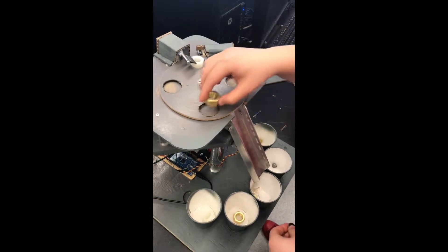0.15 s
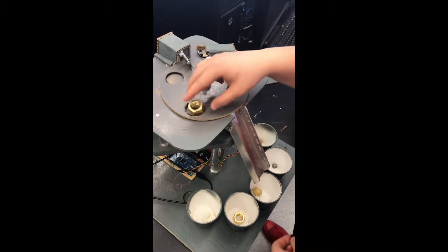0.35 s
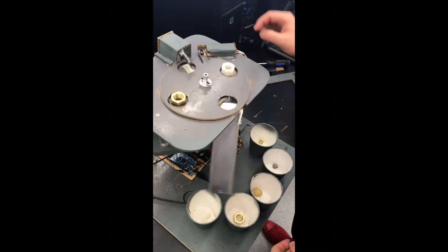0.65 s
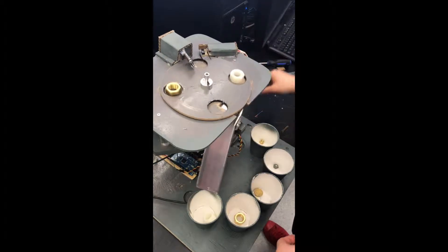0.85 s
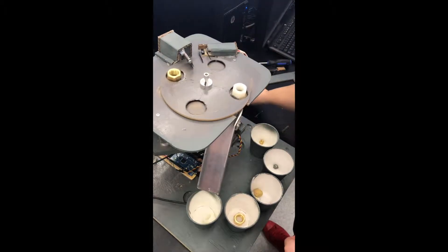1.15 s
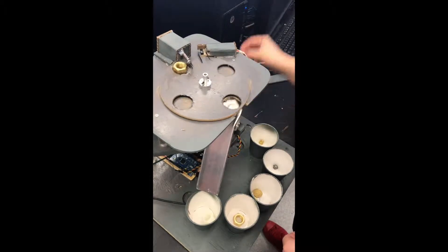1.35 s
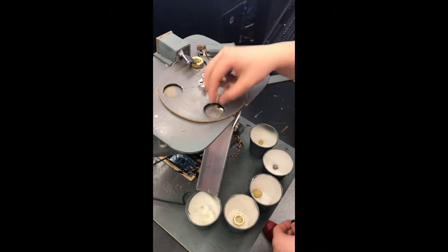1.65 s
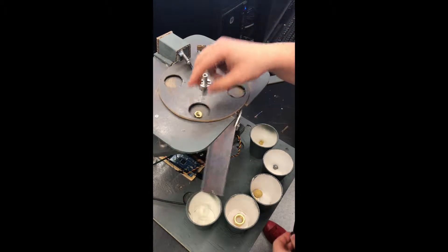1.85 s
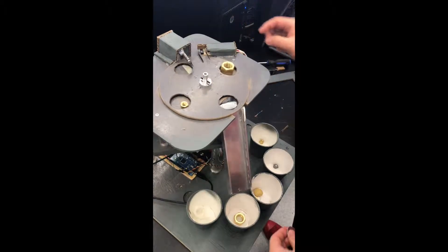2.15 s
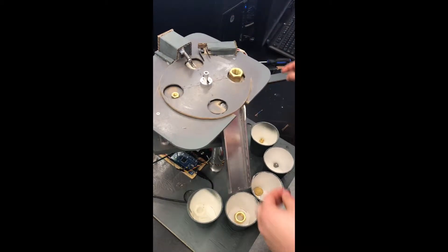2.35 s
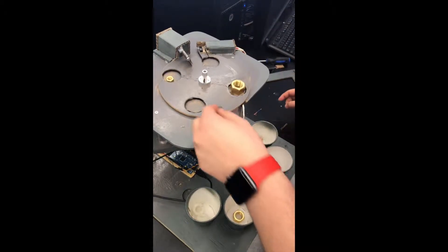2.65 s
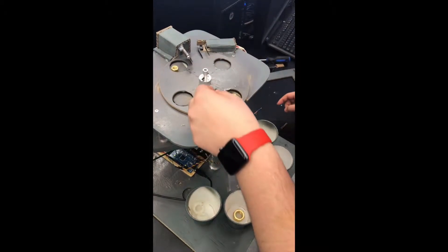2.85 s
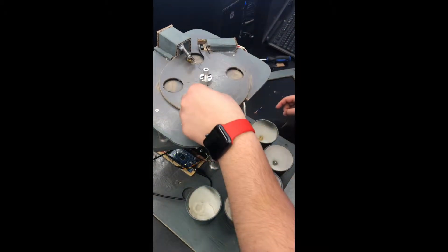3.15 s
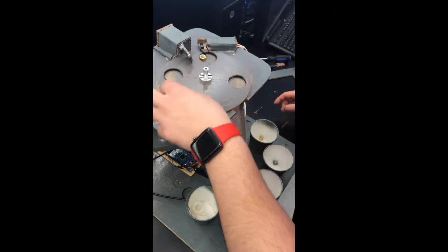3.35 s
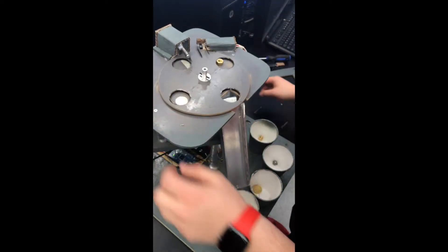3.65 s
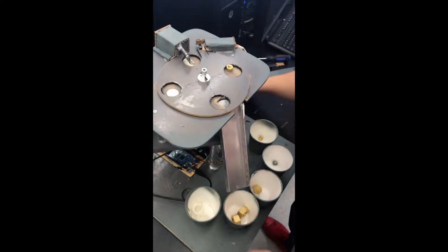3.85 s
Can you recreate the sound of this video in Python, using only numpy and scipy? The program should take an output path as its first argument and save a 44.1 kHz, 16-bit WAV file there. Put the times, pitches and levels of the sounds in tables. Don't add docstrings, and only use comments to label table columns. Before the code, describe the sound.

Metal nuts clatter in a sorting machine, heard close in a small dry room. Two disc scrapes open, then cracks and cup rattles until 0.65 s. A nasal motor whine near 900 Hz swells around 0.95-1.4 with faint dragging. Ringing scrapes follow at 1.4-1.7, a sharp ping at 1.74, knocks to 2.1, near quiet, loud disc clangs at 2.9-3.2, a hard crack at 3.3, small rattles, and whine from 3.5 to the end.

```python
import sys
import numpy as np
from scipy import signal
from scipy.fft import rfft, irfft
from scipy.io import wavfile
from scipy.ndimage import uniform_filter1d

SR = 44100
rng = np.random.default_rng(int(sys.argv[2]) if len(sys.argv) > 2 else 0)


def digitize_waveform(pressure):
    field = np.atleast_2d(pressure).T
    bounded = np.clip(field, -1, 1)
    quanta = np.round(bounded * 32767).astype(np.int16)
    wavfile.write(sys.argv[1], SR, quanta)


def attenuation_scalar(level_db):
    decades = np.asarray(level_db, float) / 20
    return 10 ** decades


N = 176400


def peak(x, db):
    return x * attenuation_scalar(db) / np.abs(x).max()


def band(x, hz, width):
    return signal.lfilter(*signal.iirpeak(hz, hz / width, SR), x)


def walk(rate):
    k = int(SR / rate)
    wander = uniform_filter1d(uniform_filter1d(rng.standard_normal(N), k), k)
    return wander / wander.std()


def add(out, start, x):
    i = int(start * SR)
    out[i:i + len(x)] += x[:N - i]


def grit(size):
    grain_db = 3 * np.minimum(rng.exponential(size=size // 40 + 1), 3)
    return rng.standard_normal(size) * attenuation_scalar(np.repeat(grain_db, 40)[:size])


def flutter(size):
    knots = np.arange(0, size + 300, 300)
    return np.interp(np.arange(size), knots, rng.standard_normal(len(knots)))


def ring(push, hz, t60):
    pole = np.exp(2j * np.pi * hz / SR - np.log(1000) / (t60 * SR))
    return signal.lfilter([1], [1, -pole], push).imag


def motor():
    # time in seconds, level in dB.
    whine = np.array([(0, -69.5), (.2, -48), (.45, -43), (.67, -51), (0.949, -37), (1.14, -37.5),
                      (1.371, -45), (1.42, -49.5), (1.65, -61), (2.28, -61.5), (2.361, -54.5), (2.76, -54),
                      (2.879, -65.5), (2.928, -52), (3.2, -66), (3.591, -35.5), (3.84, -42), (4, -39)])
    orders = {13: -16, 14: -4.5, 15: -13}
    step_hz, poles = 64.9, 14
    wobble_db, gear_db, gear_width_hz = 3, -15.5, 67
    t = np.arange(N) / SR
    db = np.interp(t, whine[:, 0], whine[:, 1])
    phase = 2 * np.pi * step_hz * t + 0.035 * walk(9.6)
    lines = 0
    for k, level in orders.items():
        lines = lines + attenuation_scalar(level + wobble_db * walk(18)) * np.sqrt(2) * np.sin(k * phase + k * k)
    whine_hz = step_hz * poles
    gear = band(rng.standard_normal(N), whine_hz, gear_width_hz)
    gear = band(gear, whine_hz, 2 * gear_width_hz)
    return attenuation_scalar(db) * (lines + attenuation_scalar(gear_db) * gear / gear.std()) + hiss(db)


def hiss(whine_db):
    # frequency in Hz, density in dB per Hz.
    colour = np.array([(60, -30.5), (198, -15.5), (437, -30), (620, -15), (924, -14), (1220, -27),
                       (6280, -38.5), (16000, -52.5)])
    # start in seconds, end in seconds, treble rise in dB.
    drags = [
        (0.642, 0.852, 20.5),
        (1.076, 1.251, 12.5),
    ]
    level_db, follow = -67.5, 0.2
    patch_db, patch_rate_hz = 6, 12
    t = np.arange(N) / SR
    logf = np.log(np.arange(N // 2 + 1) * SR / N + 1)
    spectrum = rfft(rng.standard_normal(N))
    spectrum = spectrum * attenuation_scalar(np.interp(logf, np.log(colour[:, 0]), colour[:, 1]))
    drag_db = 0
    for start, end, rise in drags:
        drag_db = drag_db + rise * uniform_filter1d(1. * (t > start) * (t < end), 1500)
    out = 0
    for hz in 40 * 2 ** (np.arange(70) / 8):
        patch = irfft(spectrum * np.exp(-((logf - np.log(hz)) / .05) ** 2), N)
        out = out + attenuation_scalar(patch_db * walk(patch_rate_hz) + drag_db * (hz > 4500)) * patch
    return out * attenuation_scalar(level_db + follow * (whine_db + 62)) / out.std()


def metal(hits, freqs, modes):
    lean_db, scatter_db, waver_db = 12.5, 2, 1.5
    cloud_db, cloud_t60_s, choke_s = -16, 0.049, 0.03
    grit_db, strike_db = -6, -10
    out, t = np.zeros(N), np.arange(SR // 4) / SR
    next_swells = [h[0] + h[3] for h in hits[1:]] + [9]
    for (start, db, favoured_hz, swell), next_swell in zip(hits, next_swells):
        shape = t / swell * np.exp(1 - t / swell)
        push = grit(len(t)) * shape
        long = 0
        for hz, (level, t60) in zip(freqs, modes):
            gain, detune = rng.standard_normal(2)
            lean = lean_db * np.exp(-(np.log(hz / favoured_hz) / 0.11) ** 2)
            held = 0.49 if start > 2.8 and hz < 6800 else 1
            tone = ring(push, hz * (1 + 0.0012 * detune), t60 * held)
            long = long + attenuation_scalar(level + scatter_db * gain + lean + waver_db * flutter(len(t))) * tone
        cloud = 0
        for pitch, loss in rng.random((18, 2)):
            cloud = cloud + attenuation_scalar(-12 * loss - 10 * pitch) * ring(push, 1600 * 15.0 ** pitch, cloud_t60_s)
        scrape = band(grit(len(t)) * (shape + attenuation_scalar(strike_db) * np.exp(-t / .03)), 4000, 6000)
        choke = 0.35 + 0.66 * np.exp(-np.maximum(t - (next_swell - start), 0) / choke_s)
        ringing = choke * (peak(long, 0) + peak(cloud, cloud_db))
        add(out, start, peak(ringing + peak(scrape, grit_db), db))
    return signal.sosfilt(signal.butter(4, 1400, "high", fs=SR, output="sos"), out)


def disc_scrapes():
    # start in seconds, peak in dB, favoured mode in Hz, time to swell in seconds.
    scrapes = [(0, -23.5, 5370, 0.0034), (.011, -24, 2350, 0.009), (.075, -23.5, 2350, 0.0018),
               (1.40, -24, 4500, 0.013), (1.4255, -24.5, 2330, 0.0023), (1.452, -22, 2330, 0.0062),
               (1.501, -27, 4500, 0.0081), (1.552, -20.5, 2350, 0.0083), (1.577, -23.5, 4500, 0.0011),
               (1.645, -27, 2350, 0.0014), (1.664, -21, 8090, 0.0081), (2.909, -19, 7900, 0.02),
               (2.962, -11.5, 6500, 0.0059), (2.9895, -13.5, 2395, 0.00058), (3.023, -10.5, 3200, 0.0032),
               (3.099, -16, 6946, 0.003), (3.13, -24, 3460, 0.0069), (3.156, -17, 7400, 0.017)]
    disc_hz = [2352, 2395, 3461, 4498, 5370, 6500, 6946, 8091, 9583, 11042, 11648, 12990, 14505]
    # level in dB, decay t60 in seconds.
    disc_modes = [(-2, 0.23), (-5.5, 0.13), (-1, 0.18), (0.5, 0.15), (-2.5, 0.17), (-5, 0.15), (-1, 0.16),
                  (-4, 0.13), (-15.5, 0.18), (-38, 0.23), (-11.5, 0.071), (-26.5, 0.44), (-16, .12)]
    return metal(scrapes, disc_hz, disc_modes)


def cup_knocks():
    # start in seconds, peak in dB, centre in Hz, rattle
    # length in seconds.
    knocks = [(0.1368, -22, 4910, 0.012), (0.15, -24.5, 1140, 0.0065), (0.2402, -27.5, 1290, 0.024),
              (0.293, -24.5, 3120, 0.01), (0.3313, -14.5, 3770, 0.0075), (0.3552, -19.5, 1290, 0.0096),
              (0.391, -26, 1090, 0.015), (0.4757, -16.5, 3000, 0.0085), (0.524, -15.5, 1560, 0.017),
              (0.5347, -20.5, 1220, 0.011), (0.548, -17, 1110, 0.019), (0.5677, -19, 1570, 0.018),
              (0.603, -15.5, 4220, 0.0033), (0.62, -24, 2530, 0.023), (1.6984, -22.5, 2350, 0.0057),
              (1.7374, -24.5, 7240, 0.0033), (1.7983, -30.5, 1700, 0.0033), (1.8614, -23, 1190, 0.028),
              (1.8732, -18, 2833, 0.011), (1.9633, -23, 2780, 0.021),
              (2.0075, -16, 1500, 0.01), (2.0469, -29, 2950, 0.024), (2.0902, -30, 3890, 0.004),
             (2.1158, -28, 3040, 0.0088), (2.1377, -32, 2120, 0.0063), (2.3085, -41.5, 1550, 0.03),
             (3.2443, -21, 1440, 0.014), (3.3112, -10.5, 2390, 0.0047), (3.3573, -22, 2150, 0.0077),
             (3.4216, -27, 3860, 0.0033), (3.4565, -28.5, 3840, 0.022), (3.5406, -26.5, 2230, 0.017),
             (3.606, -18, 3060, 0.0059), (3.6622, -32.5, 3020, 0.03), (3.7077, -27.5, 3410, 0.02),
             (3.7334, -23.5, 2320, 0.0071), (3.7563, -26.5, 2650, 0.0089), (3.7715, -23, 3100, 0.0048)]
    # centre in Hz, width in Hz, level in dB.
    cup = [(1032, 190, -6), (1550, 99, -6), (2120, 51, -9.5), (2650, 14, -16), (3040, 220, -2.5),
           (3818, 99, -7), (7840, 380, -19.5)]
    crack_db, body_db, broad_db, scatter_db = 16.5, 2.5, 6, 5
    tail_db, tail_stretch = -20, 2.81
    out, t = np.zeros(N), np.arange(SR // 5) / SR
    for start, db, hz, length in knocks:
        bounces = np.convolve(rng.random(len(t)) < 120 / SR, np.exp(-t[:200] / 0.0017))[:len(t)]
        crack = attenuation_scalar(crack_db) * np.exp(-t / 0.00029)
        rattle = np.exp(-t / length)
        tail = attenuation_scalar(tail_db) * np.exp(-t / (tail_stretch * length)) * (1 + 3. * bounces)
        push = grit(len(t)) * (crack + rattle + tail) * (1 - np.exp(-t / 0.00015))
        body = 0
        for f, width, level in cup:
            gain, detune = rng.standard_normal(2)
            mode = band(push, f * (1 + 0.028 * detune), width) / np.sqrt(width)
            body = body + attenuation_scalar(level + scatter_db * gain) * mode
        broad = band(band(push, hz, 1.9 * hz), hz, 1.7 * hz)
        own = peak(band(push, hz, 250), 0) + peak(broad, broad_db)
        add(out, start, peak(own + peak(band(body, hz, 0.84 * hz), body_db), db))
    return out


def soft(hits, width, rise):
    out, t = np.zeros(N), np.arange(SR // 3) / SR
    for start, db, hz, length in hits:
        push = grit(len(t)) * (1 - np.exp(-t / (rise * length))) * np.exp(-t / length)
        add(out, start, peak(band(band(push, hz, width * hz), hz, 2 * width * hz), db))
    return out


def bench_thuds():
    # start in seconds, peak in dB, pitch in Hz, length in seconds.
    thuds = [(.148, -30.5, 295, 0.02), (.335, -16, 756, 0.024), (.478, -20, 980, 0.011),
             (.55, -35.5, 241, 0.024), (1.67, -32, 783, 0.013), (1.72, -36, 278, 0.07),
             (1.77, -33.5, 540, 0.018), (1.80, -30, 750, 0.028), (2.01, -24.5, 816, 0.019),
             (2.07, -35, 648, 0.061), (2.93, -46, 308, 0.084), (3.23, -32.5, 153, 0.047),
             (3.84, -48, 237, 0.018)]
    return soft(thuds, 0.72, rise=0.053)


def nut_hits():
    # start in seconds, peak in dB, favoured mode in Hz, scrape length in seconds.
    clinks = [
        (.262, -25, 12700, .002),
        (.304, -31, 12700, .003),
        (.338, -22.5, 12030, .003),
    ]
    nut_hz = [4020, 7800, 10470, 12707]
    # level in dB, decay t60 in seconds.
    nut_modes = [(-13.5, .12), (-7, 0.044), (-13, 0.25), (-14, 0.11)]
    return metal(clinks, nut_hz, nut_modes)


def disc_ticks():
    # start in seconds, peak in dB, centre in Hz, length in seconds.
    ticks = [
        (.68, -34, 3450, 0.019),
        (.79, -38.5, 3380, 0.023),
        (.76, -47, 1760, .04),
        (.857, -46.5, 1710, .08),
        (1.21, -45, 3175, 0.005),
        (3.845, -39, 2926, 0.017),
        (3.895, -40, 2960, 0.016),
        (3.955, -42, 3030, 0.011),
    ]
    return soft(ticks, 0.096, rise=0.23)


def nut_ping():
    # start in seconds, peak in dB, mode in Hz, time to swell in seconds.
    ping = [
        (1.7418, -9.5, 7830, .0004),
    ]
    return metal(ping, [7830], [(0, 0.015)])


def room(dry):
    room_db, t60_s = -23, 0.32
    t = np.arange(SR // 3) / SR
    tail = band(rng.standard_normal(len(t)), 2500, 5000)
    tail = tail * np.exp(-np.log(1000) * t / t60_s) * (t > .004)
    return attenuation_scalar(room_db) * signal.fftconvolve(dry, tail / np.sqrt(np.sum(tail ** 2)))[:N]


def scene():
    contacts = disc_scrapes() + cup_knocks() + bench_thuds() + nut_hits() + disc_ticks() + nut_ping()
    return (contacts + room(contacts) + motor())[None]


def roll_off(x):
    return signal.sosfilt(signal.butter(12, 16820, fs=SR, output="sos"), x)


def record(dry):
    x = signal.sosfilt(signal.butter(2, 90, "high", fs=SR, output="sos"), dry)
    x = signal.sosfilt(signal.ellip(8, .2, 60, 15600, fs=SR, output="sos"), x)
    return roll_off(x)


dry = scene()
out = record(dry)
digitize_waveform(out)
```